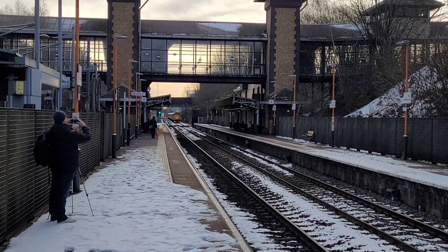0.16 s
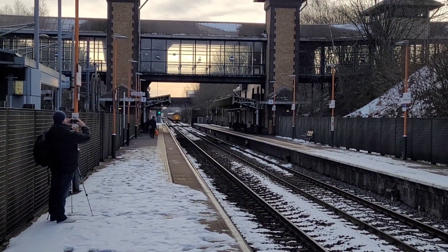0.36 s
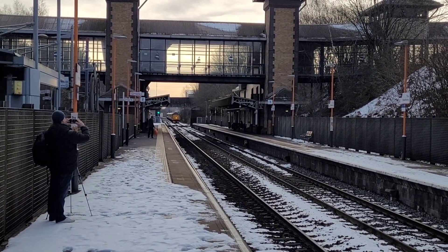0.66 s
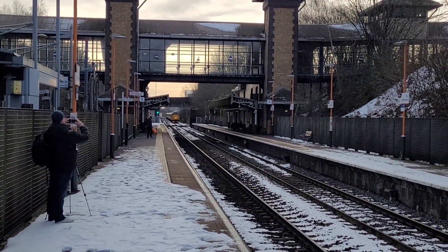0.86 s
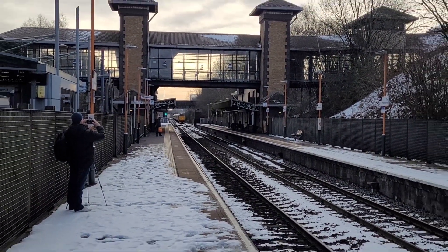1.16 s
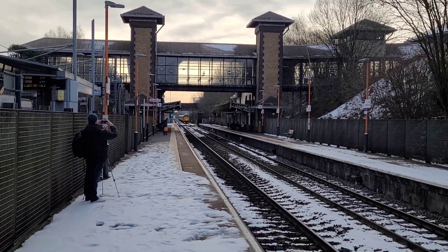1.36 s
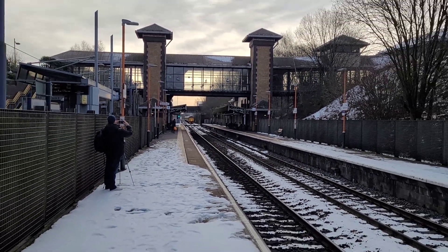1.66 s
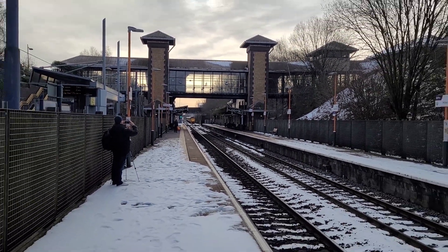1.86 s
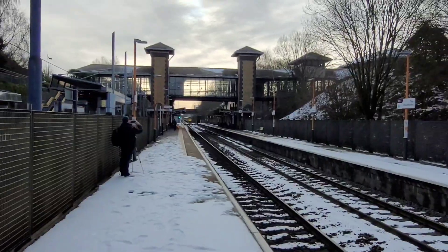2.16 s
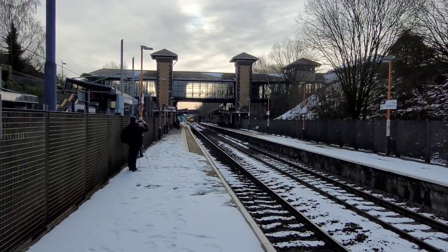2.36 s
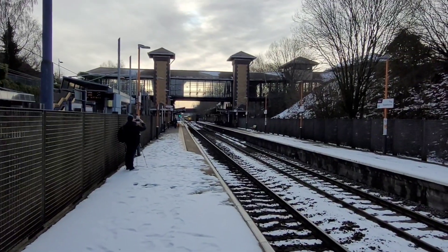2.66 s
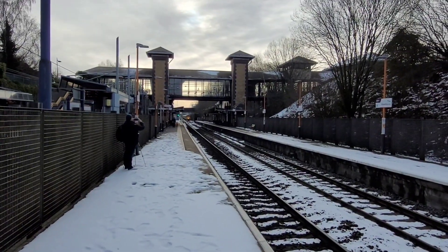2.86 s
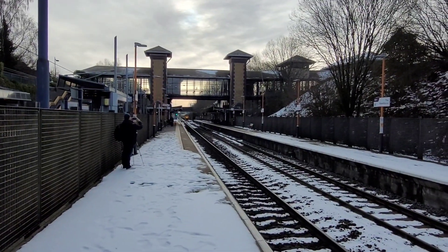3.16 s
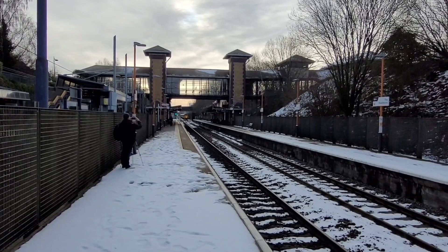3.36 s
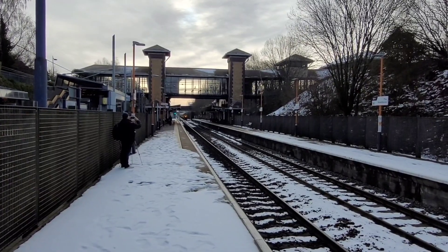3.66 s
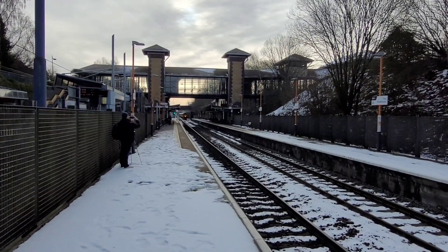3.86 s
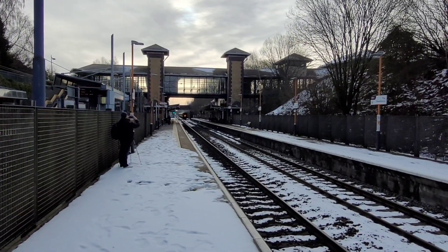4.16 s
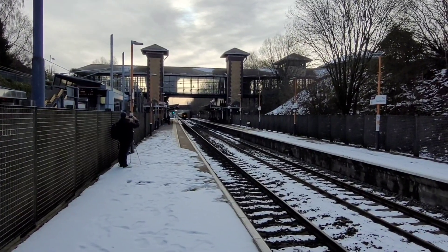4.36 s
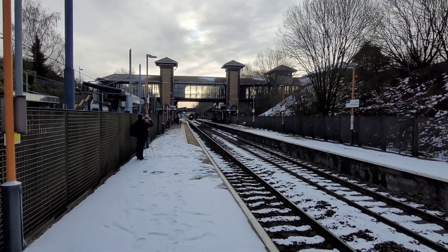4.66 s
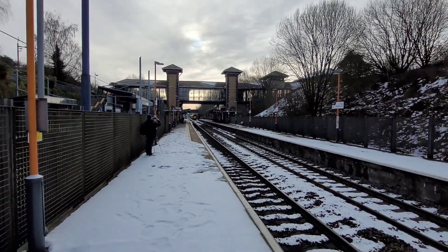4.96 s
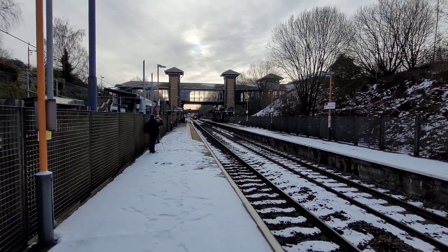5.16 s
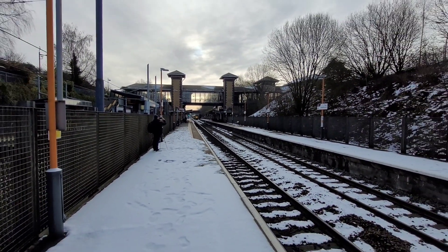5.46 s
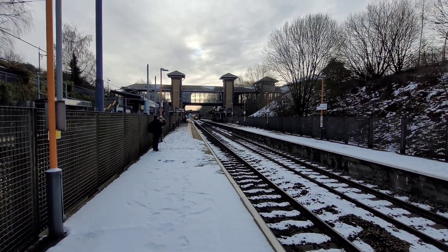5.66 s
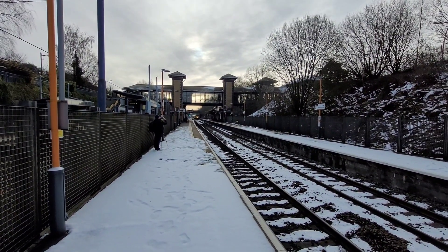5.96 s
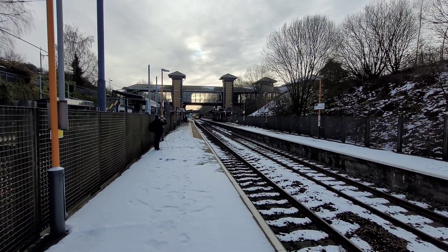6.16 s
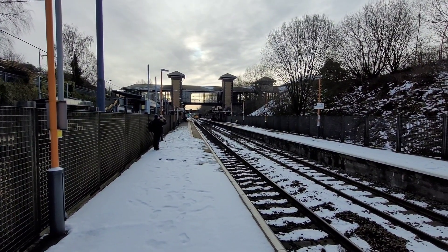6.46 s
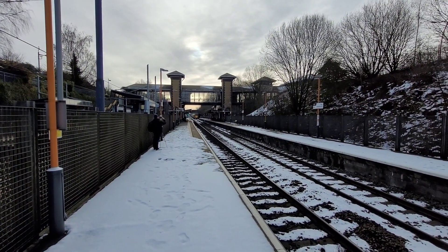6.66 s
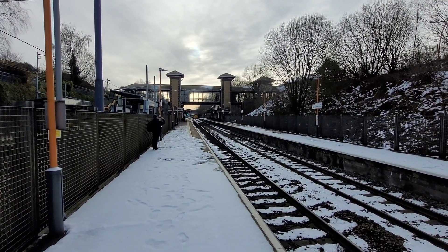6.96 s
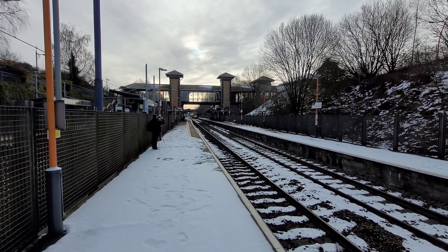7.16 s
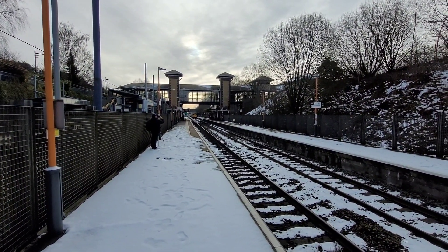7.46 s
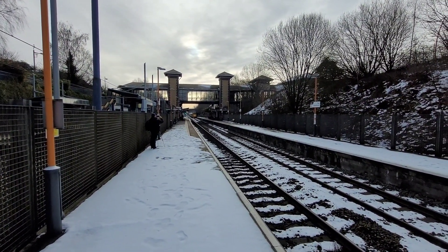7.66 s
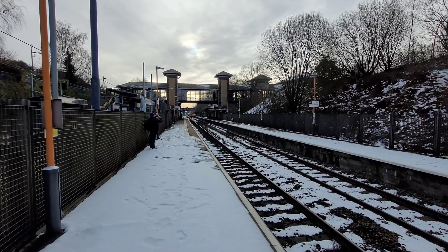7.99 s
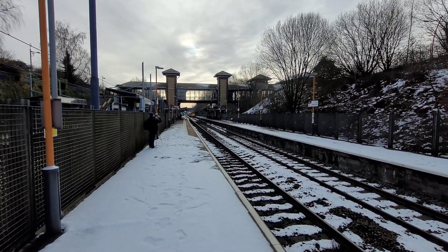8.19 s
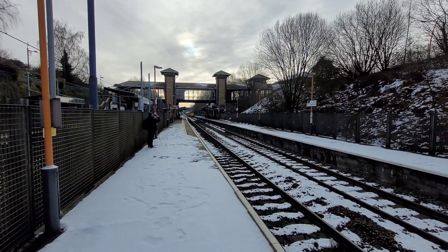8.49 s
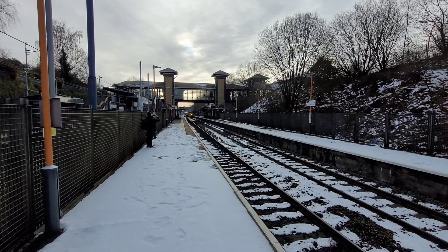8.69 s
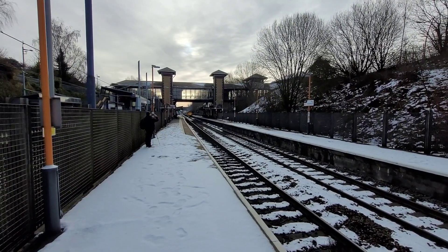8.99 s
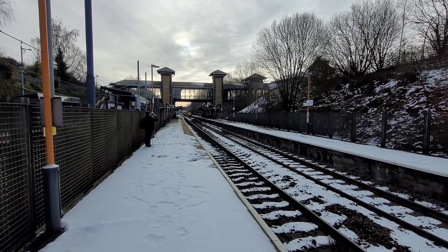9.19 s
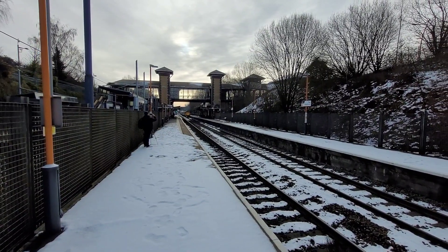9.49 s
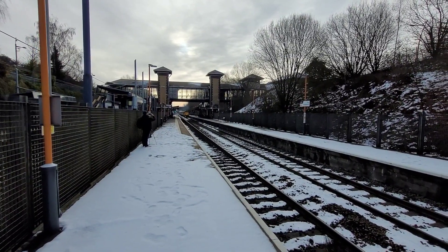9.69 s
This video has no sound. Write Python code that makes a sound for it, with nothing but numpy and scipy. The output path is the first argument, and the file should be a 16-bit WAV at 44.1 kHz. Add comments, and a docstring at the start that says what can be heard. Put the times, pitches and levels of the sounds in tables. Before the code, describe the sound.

Outdoors on a snowy station platform, two diesel locomotives approach under heavy load. A low, steady throbbing hum comes first, then exhaust roar, metallic clatter and hiss build, jumping up around halfway. A small bird sings quick gliding notes early and again later, with thin falling whistles from another, echoing off walls. Two short hollow pops come close on the right near the end. Stereo handheld microphone, train still approaching at the finish.

```python
"""A low, throbbing diesel hum comes first: two locomotives work hard up a straight line towards a platform.
Each four-stroke engine hums on multiples of its own firing cycle, built from sines; shaped noise makes rumble,
exhaust roar, clatter and hiss, which throb with the firings and swell. Decaying sines make knocks and barks.
Two small birds whistle gliding notes among echoing hard walls.
Late on, something close by on the right pops twice: a ringing cavity, then a short hiss."""
import sys
import numpy as np
from scipy import signal
from scipy.fft import rfft, irfft, next_fast_len
from scipy.io import wavfile
from scipy.ndimage import uniform_filter1d, map_coordinates

SR = 44100
rng = np.random.default_rng(int(sys.argv[2]) if len(sys.argv) > 2 else 0)


def master_out(mix):
    """Clip the mix to full scale and print it as 16-bit PCM to the path in sys.argv[1]."""
    frames = np.transpose(np.atleast_2d(mix))
    ceiling = np.clip(frames, -1, 1)
    pcm = np.round(ceiling * 32767).astype(np.int16)
    wavfile.write(sys.argv[1], SR, pcm)


N = 433503


def amp(db):
    """Decibels to amplitude."""
    return 10 ** (np.asarray(db) / 20)


def unit(x):
    """Scale to an rms of 1."""
    return x / np.sqrt(np.mean(x ** 2) + 1e-20)


def along(points, hz):
    """Read (Hz, value) points on a log frequency axis."""
    f, v = np.transpose(points)
    return np.interp(np.log(hz + 1), np.log(f + 1), v)


def curves(rows):
    """One value per sample for each column after the time."""
    s, *cols = np.transpose(rows)
    return [np.interp(np.arange(N) / SR, s, c) for c in cols]


def wobble(rate):
    """A smooth random curve with rate knots a second."""
    positions = np.arange(0, N + 64, 64) * rate / SR
    knots = map_coordinates(rng.standard_normal(int(N * rate / SR) + 4), [positions])
    return np.interp(np.arange(N), np.arange(len(knots)) * 64, knots)


def filtered(x, response):
    """Multiply the spectrum of x by a complex response of frequency."""
    m = next_fast_len(N + SR // 2)
    return irfft(rfft(x, m) * response(np.fft.rfftfreq(m, 1 / SR)), m)[..., :N]


def rush(spectrum, gate, patchy_db):
    """Two unrelated gated noises of rms 1, with patches of random gain in time and pitch."""
    z = signal.stft(rng.standard_normal((2, N)) * gate, nperseg=512)[2]
    field = rng.standard_normal(z.shape[1:])
    field = uniform_filter1d(uniform_filter1d(field, 4, 0), 8, 1)
    pair = signal.istft(z * amp(patchy_db * unit(field)), nperseg=512)[1][:, :N]
    return unit(filtered(pair, lambda hz: amp(along(spectrum, hz))))


def hum(turns, order, db, fading_db):
    """One order of a rotation; moving air and echoes make it fade and slip in phase."""
    slip = rng.uniform(0, 2 * np.pi) + .22 * wobble(2)  # radians
    level = np.sqrt(2) * amp(db + fading_db * wobble(2.5))
    return level * np.sin(2 * np.pi * order * turns + slip)


# Deep throb, rms: start_s, leading_9th_level_db, trailing_9th_level_db, leading_18th_level_db, leading_6th_level_db
THROB_LEVELS = [(0, -39, -56, -54, -50.5), (1.8, -37.5, -53.5, -53.5, -48), (2.2, -35.5, -48.5, -46, -51),
                (3.15, -38.5, -45, -45, -46.5), (3.6, -34.5, -45.5, -43.5, -45.5),
                (4.5, -35, -52.5, -44.5, -42.5), (4.98, -46, -46, -51.5, -45),
                (5.36, -31.5, -49.5, -38.5, -46), (6.13, -35, -41, -36.5, -42),
                (6.54, -31.5, -39.5, -36, -49), (7.03, -29, -35.5, -36.5, -46),
                (7.64, -40.5, -34.5, -41, -52), (8.3, -38, -32, -39.5, -45), (8.75, -38, -33, -36.5, -49),
                (9.36, -46.5, -43, -36.5, -44), (9.83, -38.5, -36.5, -39, -47.5)]
# Strong leading-engine orders: cycle_multiple, far_level_db (rms), near_level_db (rms)
LEADING_ORDERS = [(8, -58, -49), (10, -50, -46), (11, -54, -45), (12, -54, -43), (16, -54, -43),
                  (17, -57, -44), (19, -52, -46), (20, -69, -45), (22, -53, -37), (23, -52.5, -39),
                  (24, -67, -48), (25, -60, -46), (29, -66, -43), (30, -57, -50), (31, -62, -48),
                  (32, -58, -48), (34, -56, -47), (35, -55, -48), (46, -60.5, -47)]
# Trailing-engine orders: cycle_multiple, level_db (relative to its ninth)
TRAILING_ORDERS = [(6, -17), (11, -11), (16, -13), (18, -11), (19, -13), (22, -12), (27, -10), (34, -4)]
# Remaining leading orders from the 13th to the 47th, with random scatter in level
FAINT_FAR_DB, FAINT_NEAR_DB, FAINT_SCATTER_DB = -67.5, -59.5, 3


def engine_hum(near, lead_turns, trail_turns):
    """Periodic firing makes sines at whole multiples of each engine's cycle rate."""
    lead_db, trail_db, octave_db, firing_db = curves(THROB_LEVELS)
    tones = hum(lead_turns, order=9, db=lead_db, fading_db=-0.5)
    tones += hum(trail_turns, order=9, db=trail_db, fading_db=3)
    tones += hum(lead_turns, order=18, db=octave_db, fading_db=1.5)
    tones += hum(lead_turns, order=6, db=firing_db, fading_db=1.5)
    strong = [18] + [round(row[0]) for row in LEADING_ORDERS]
    scatter_db = FAINT_SCATTER_DB * rng.standard_normal(35)
    faint = [(k, FAINT_FAR_DB + d, FAINT_NEAR_DB + d)
             for k, d in zip(range(13, 48), scatter_db) if k not in strong]
    for k, far_db, near_db in LEADING_ORDERS + faint:
        level_db = far_db + near * (near_db - far_db)
        tones += hum(lead_turns, order=round(k), db=level_db, fading_db=1.5)
    for k, db in TRAILING_ORDERS:
        tones += hum(trail_turns, order=round(k), db=trail_db + db, fading_db=2.5)
    return tones


# Uneven strength of the six firings in a cycle: level_db
CYLINDER_LEVELS = [-3.5, -6, 2, -8.5, 2, 0]


def firing_puffs(firing):
    """Each of six firings a cycle opens a burst that decays towards the next."""
    strength = amp(np.take(CYLINDER_LEVELS, firing.astype(int) % 6))
    puffs = strength * np.exp(-2.5 * (firing % 1))
    return unit(uniform_filter1d(puffs, 250))  # echoes blur the puffs


# Noise colours of the engine layers, each: pitch_hz, level_db (relative, per Hz)
RUMBLE_COLOUR = [(22, -49.5), (31, -29.5), (42, -5), (52, -11.5), (70, -5.5), (102, -0.5), (145, -1.5),
                 (200, -5), (249, 0), (370, -16.5), (460, -11), (570, -20), (770, -120)]
ROAR_COLOUR = [(210, -11.5), (350, -5), (390, -6.5), (451, -1.5), (596, -3.5), (690, -0.5), (830, -3.5),
               (1000, -8), (1150, -9.5), (1500, -59.5), (2530, -120)]
CLATTER_COLOUR = [(680, -30.5), (1150, -3.5), (1560, -1), (1780, -8.5), (1970, -10), (2200, -13),
                  (2500, -23), (3120, -46), (5280, -120)]
HISS_FAR_COLOUR = [(1410, -21), (2400, -1.5), (2800, 0), (3050, -1), (3320, -0.5), (3680, -6.5), (4050, -7),
                   (4550, -9), (5970, -24), (8000, -36.5), (10400, -67), (17600, -120)]
HISS_NEAR_COLOUR = [(1410, -26), (2400, -3.5), (4740, -6.5), (6950, -16.5), (8310, -33), (9950, -26),
                    (11500, -43.5), (12100, -58), (15500, -48.5)]
# Base levels in dB: the rumble's before its nearness gain, the others' before the swell is added
RUMBLE_DB, ROAR_DB, HISS_FAR_DB, HISS_NEAR_DB = -45.5, -41.5, -61, -55
RUMBLE_NEAR_DB = 12  # gained as the hum nears
HISS_GROWS = 0.86  # dB gained per dB of swell


def engine_noise(near, bright, puffs, swell_db, roar_db, clatter_db):
    """Noise throbs with the firings; the air swallows less treble as the path shortens."""
    def gate(depth):
        # each part of the engine puffs at its own moment of the cycle
        shifted = np.roll(puffs, rng.integers(SR // 7))
        return 1 + depth * amp(4.1 * wobble(1.707)) * (shifted - 1)

    hiss_db = HISS_GROWS * swell_db
    rumble_level = amp(RUMBLE_DB + RUMBLE_NEAR_DB * near)
    far_level = amp(hiss_db + HISS_FAR_DB) * np.sqrt(1 - bright)
    near_level = amp(hiss_db + HISS_NEAR_DB) * np.sqrt(bright)
    noise = rumble_level * rush(RUMBLE_COLOUR, gate(0.16), patchy_db=2.2)
    noise += amp(ROAR_DB + roar_db) * rush(ROAR_COLOUR, gate(0.17), patchy_db=1.4)
    noise += amp(clatter_db) * rush(CLATTER_COLOUR, gate(0.22), patchy_db=2.0)
    noise += far_level * rush(HISS_FAR_COLOUR, gate(0.29), patchy_db=2.0)
    noise += near_level * rush(HISS_NEAR_COLOUR, gate(0.26), patchy_db=2.0)
    return noise


# Blower whistles: pitch_hz, level_db (relative)
WHISTLES = [(4829, 0), (3651, -5)]
# Shared whistle level: start_s, level_db (rms)
WHISTLE_LEVEL = [(0, -84), (3.7, -79), (4.2, -73), (5.3, -72), (6.5, -68), (7.5, -63), (9.83, -64)]


def blower_whine():
    """Blowers whistle as thin sines whose pitch wanders slightly."""
    out = np.zeros(N)
    for hz, db in WHISTLES:
        drift = np.cumsum(1 + .0015 * wobble(12)) / SR
        out += hum(drift, order=hz, db=db + curves(WHISTLE_LEVEL)[0], fading_db=2.5)
    return out


# Clearest metal knocks, often one cycle apart: start_s, level_db (before the attack), pitch_hz
CLEAR_KNOCKS = [(2.9, -25, 1107), (3.13, -22, 1620), (3.18, -29.5, 2020), (3.232, -26.5, 1600),
                (3.32, -27, 1410), (3.392, -35.5, 2050), (3.468, -24.5, 1397), (3.692, -22.5, 1640),
                (3.833, -26, 1820), (4.018, -31, 1990), (4.158, -31.5, 2015), (4.297, -28.5, 1690),
                (5.274, -23.5, 2040), (5.974, -22.5, 1660), (6.82, -25.5, 1980), (4.788, -28, 2980),
                (5.207, -46, 2950), (5.892, -37, 3150), (6.047, -30.5, 3310), (6.162, -40, 3210),
                (6.188, -25, 3050), (6.606, -38, 3140)]


def metal_knocks(firing, clatter_db):
    """Every firing knocks the block a little, a few much harder; each knock is a decaying sine."""
    out, t = np.zeros(N), np.arange(600) / SR
    at = np.flatnonzero(np.diff(firing.astype(int)))
    luck = rng.random((len(at), 3))
    rare_db = -2.5 * np.log(1 - .97 * luck[:, 1])
    size_db = clatter_db[at] + 3.5 + rare_db - 9 * luck[:, 2]  # higher knocks are fainter
    chance = zip(at / SR + .02 * luck[:, 0], size_db, 1300 + 900 * luck[:, 2])
    for s, db, hz in CLEAR_KNOCKS + list(chance)[:-2]:  # the last two would crowd the end
        knock = (1 - np.exp(-t / 0.001)) * amp(db - 60 * t / 0.033) * np.sin(2 * np.pi * hz * t)
        out[round(s * SR):][:len(t)] += knock
    return out


# Hard exhaust barks: start_s, level_db (before the attack), pitch_hz
BARK_HITS = [(0.456, -29.5, 1300), (4.043, -29, 777), (4.302, -26.5, 794), (4.396, -24.5, 854),
             (4.843, -21.5, 587), (5.089, -23, 774), (5.183, -19, 808), (5.232, -16.5, 878),
             (5.258, -19, 778), (5.401, -29.5, 704), (5.464, -20, 820), (5.631, -21, 828),
             (5.651, -19, 832), (5.824, -20.5, 624), (5.972, -15.5, 557), (6.767, -23, 714),
             (7.895, -22, 640), (9.198, -15.5, 628)]


def exhaust_barks():
    """A hard exhaust bark is a sine with a very fast attack and a short decay."""
    out, t = np.zeros(N), np.arange(600) / SR
    for s, db, hz in BARK_HITS:
        envelope = (1 - np.exp(-(t / 0.00017) ** 2)) * amp(db - 60 * t / 0.026)
        out[round(s * SR):][:len(t)] += envelope * np.sin(2 * np.pi * hz * t)
    return out


# Approach: start_s, hum_nearness (0-1), treble_share let through by the air (0-1)
NEARING = [(0, 0, 0), (2, 0.24, 0.03), (3.5, 0.29, 0.01), (5, 0.48, 0.05), (5.5, 0.79, 0.05),
           (6.3, 0.81, 0.14), (7.5, 1, 0.23), (8.7, 1, 0.74), (9.83, 1, 0.9)]
# Engine speeds, each: start_s, cycle_hz
LEADING_SPEED = [(0, 7.149), (2.5, 7.155), (5, 7.155), (6.5, 7.144), (9.83, 7.141)]
TRAILING_SPEED = [(0, 6.69), (4, 6.63), (6.5, 6.605), (9.83, 6.59)]
# Swell of the engine noise: start_s, general_gain_db, roar_gain_db
NOISE_SWELL = [(0, 0, -2), (.4, 2, 0), (1.75, 2, 0), (2.3, 3.5, 2), (3, 5, 3), (3.9, 6, 3.5), (4.4, 6, 6.5),
               (4.95, 7, 8.5), (5.2, 12.5, 9.5), (5.38, 13.5, 8), (5.7, 13.5, 10.5), (6.07, 14, 10),
               (6.4, 10.5, 8), (7.1, 10.5, 9.5), (8.1, 10.5, 10), (8.7, 11.5, 12), (9.3, 11.5, 10.5),
               (9.83, 12.5, 11)]
CLATTER_DB, CLATTER_GROWS = -47.5, 0.84  # base level, dB gained per dB of swell


def engines():
    """Both engines as (direct sound, scattered sound), driven by their cycles and the approach."""
    near, bright = np.clip(curves(NEARING), 0, 1)
    lead_turns = np.cumsum(curves(LEADING_SPEED)[0]) / SR
    trail_turns = np.cumsum(curves(TRAILING_SPEED)[0]) / SR
    firing = 6 * lead_turns
    swell_db, roar_db = curves(NOISE_SWELL)
    clatter_db = CLATTER_DB + CLATTER_GROWS * swell_db
    tones = engine_hum(near, lead_turns, trail_turns)
    noise = engine_noise(near, bright, firing_puffs(firing), swell_db, roar_db, clatter_db)
    noise[0] += blower_whine() + metal_knocks(firing, clatter_db) + exhaust_barks()
    return noise + tones * [[1], [.1]]


# Likeness of the two ports: pitch_hz, likeness (1 = alike)
PORT_LIKENESS = [(60, 1), (250, 0.86), (700, 0.98), (1400, 0.64), (2800, 0.39), (5000, 0.58), (12000, 0.48)]
# Phase lead of the left port: pitch_hz, lead_radians
LEFT_PHASE = [(0, 0.51), (780, 0.14), (1030, 0.78), (1380, 0.26), (1720, 1.08), (1980, 0.9), (2670, 3),
              (3010, 2.5), (3960, 0.78), (4820, 0.91), (6370, 2.2), (9040, 3.9), (11100, 2.1), (15200, 6.1)]
# Level balance: pitch_hz, left_minus_right_db
LEFT_BALANCE = [(60, -2.2), (110, -1.7), (200, -1.3), (380, -0.8), (700, -3.0), (1290, -5.5), (2380, -1.5),
                (4400, -.5), (8120, 1.5), (15000, 2.5)]


def ports(direct, scattered):
    """Two microphone ports: alike in the bass, less so in the treble; the train drifts to the left."""
    def turn(hz):
        return np.arccos(np.clip(along(PORT_LIKENESS, hz), -1, 1)) / 2

    def half(hz):
        # half of the difference goes to each port
        return amp(along(LEFT_BALANCE, hz) / 2) * np.exp(.5j * along(LEFT_PHASE, hz))

    mid = filtered(direct, lambda hz: np.cos(turn(hz)))
    side = filtered(scattered, lambda hz: np.sin(turn(hz)))
    pair = np.array([mid + side, mid - side])
    left, right = filtered(pair, lambda hz: np.array([half(hz), 1 / half(hz)]))
    early = np.linspace(-1.5, 1.5, N)  # samples
    return np.array([map_coordinates(left, [np.arange(N) + early], mode="nearest"), right])


SHADE_HZ = 5200  # above it branches hide a singer's direct path
FIRST_WALL_S, BANK_S, BANK_DEPTH_S = .005, .08, .04  # echo begins, peaks off the far bank, is spread
HEDGE_DB, HEDGE_T60_S, YARD_T60_S = 3, .07, .85  # quick scatter off near branches over the long echo


def yard_echo(t):
    """Decaying noise: near branches, a far bank and a long yard echo, after the first wall."""
    hedge = amp(HEDGE_DB - 60 * t / HEDGE_T60_S)
    bank = .5 * np.exp(-((t - BANK_S) / BANK_DEPTH_S) ** 2)
    envelope = (hedge + amp(-60 * t / YARD_T60_S) + bank) * (t > FIRST_WALL_S)
    tail = rng.standard_normal((2, len(t))) * envelope
    return tail / np.linalg.norm(tail[0])


def bird(notes, times, left_db, shade_db_per_khz):
    """Whistled glides through three pitches, each phrase with its own echo off walls and banks."""
    out, t = np.zeros((2, N + 3 * SR)), np.arange(SR // 2) / SR
    for s, db, echo_db, stretch in times:
        dry, seen = np.zeros((2, 2 * SR))  # the full song, and what reaches us directly
        for start, length, a_hz, b_hz, c_hz, note_db in notes:
            start, length = start * stretch, length * stretch
            u = np.linspace(0, 1, round(length * SR))
            # a parabola through the three pitches
            hz = 2 * (u - .5) * (u - 1) * a_hz - 4 * u * (u - 1) * b_hz + 2 * u * (u - .5) * c_hz
            flutter = np.sin(2 * np.pi * (58 * u * length + rng.random()))  # in pitch and level
            hz += 55 * flutter
            envelope = amp(note_db + 3 * flutter) * np.sin(np.pi * u) ** 0.5
            note = envelope * np.sin(2 * np.pi * np.cumsum(hz) / SR)
            shade = amp(-shade_db_per_khz * np.maximum(hz - SHADE_HZ, 0) / 1000)
            first = max(round(start * SR), 0)
            dry[first:][:len(u)] += note
            seen[first:][:len(u)] += note * shade
        wet = signal.fftconvolve(dry[None], yard_echo(t), axes=1)[:, :len(dry)]
        phrase = seen * amp([[left_db], [-left_db]]) + amp(echo_db) * wet
        out[:, round(s * SR):][:, :len(dry)] += amp(db) * phrase
    return out[:, :N]


# Song notes before stretch and flutter: start_s, length_s, first_hz, middle_hz, last_hz, level_db (relative)
SONG_NOTES = [(0.0, 0.085, 5050, 5170, 5130, -3), (.23, 0.029, 4410, 4240, 3580, -5.5),
              (.397, 0.037, 6480, 6050, 5250, -4), (.44, 0.021, 4400, 4920, 4190, -1),
              (.463, .014, 4100, 4860, 5380, 0), (.477, 0.024, 5300, 5250, 5030, -7),
              (.547, 0.024, 4850, 5520, 4480, -4), (.572, 0.022, 4450, 5135, 4570, 3.5),
              (.608, 0.036, 4480, 4440, 4150, -1), (.69, 0.028, 6240, 6040, 5900, -6),
              (.722, 0.056, 7150, 6280, 5670, -5.5), (.788, 0.03, 4750, 5040, 5200, -3.5),
              (.815, 0.021, 5850, 5500, 5100, -4), (.838, 0.026, 5250, 5470, 5660, -1.5),
              (.928, 0.023, 4000, 4570, 3890, -1.5), (.956, 0.015, 4250, 4320, 3800, -2.5),
              (.98, 0.032, 4450, 4810, 3940, -4), (1.06, 0.02, 4950, 4580, 3940, -5),
              (1.155, 0.067, 5340, 4830, 4460, 2), (1.235, 0.036, 4920, 4970, 4780, -1),
              (1.315, 0.025, 6200, 5760, 5830, -16), (1.328, 0.035, 5050, 5480, 5730, -2),
              (1.358, 0.115, 5600, 5400, 5030, -4.5), (1.64, 0.05, 3900, 4780, 5120, -1),
              (1.685, 0.018, 5180, 4740, 4250, -0.5), (1.725, 0.02, 5310, 4830, 4210, -2),
              (1.77, 0.016, 5380, 4800, 4320, -12), (1.81, 0.016, 5300, 4540, 4330, -5)]
# Songs: start_s, level_db, echo_db (relative), time_stretch (factor)
SONG_TIMES = [(1.003, -54.5, 5, 1.022), (6.8, -49.5, -1.5, 1)]


def singer():
    """A bird left of centre sings quick glides, its direct treble shaded by branches."""
    return bird(SONG_NOTES, SONG_TIMES, left_db=4.0, shade_db_per_khz=3.5)


# Call notes before stretch and flutter: start_s, length_s, first_hz, middle_hz, last_hz, level_db (relative)
CALL_NOTES = [(0, 0.051, 7700, 7600, 6450, -5), (.16, 0.059, 7830, 7430, 6540, -5.5),
              (.29, .05, 7500, 7100, 6550, -9)]
# Calls: start_s, level_db, echo_db (relative), time_stretch (factor)
CALL_TIMES = [(1.325, -73, 5, 0.96), (4.345, -68, 3, 1), (7.83, -66, 1, 1)]


def caller():
    """A second bird, also left, repeats three falling whistles on an unshaded path."""
    return bird(CALL_NOTES, CALL_TIMES, left_db=5.0, shade_db_per_khz=0)


# Pops: start_s, level_db (before port gain), cavity_hz, t60_s, hiss_level_db (rms before its envelope)
POP_HITS = [(8.8572, -.2, 850, 0.0062, -56), (9.413, 3.2, 680, 0.0085, -50)]
# Colour of the hiss after a pop: pitch_hz, level_db (relative, per Hz)
PUFF_COLOUR = [(3530, -28.5), (6000, -4), (7380, -3), (8450, -16), (9000, -16), (12800, -8), (15500, -19.5)]
THUD_HZ, THUD_DB, THUD_T60_S = 474, -17.5, 0.011  # the duller body under each pop
SNAP_HZ, SNAP_DB, SNAP_T60_S = 1800, -27, .006  # the sharp edge on top of it


def pops():
    """A small hollow cavity rings briefly as decaying modes; a short hiss follows."""
    out, t = np.zeros((2, N + SR)), np.arange(SR // 5) / SR
    hiss = rush(PUFF_COLOUR, 1, patchy_db=4.0)
    late = t - np.array([[.00012], [0]])  # the left port lies farther away
    thud = amp(THUD_DB - 60 * late / THUD_T60_S) * np.sin(2 * np.pi * THUD_HZ * late)
    snap = amp(SNAP_DB - 60 * late / SNAP_T60_S) * np.sin(2 * np.pi * SNAP_HZ * late)
    attack = (1 - np.exp(-(late / 0.00055) ** 2)) * (late > 0)
    swell = np.interp(t, [.004, .012, .065, .1], [0, 1, .7, 0])
    for s, db, hz, t60, hiss_db in POP_HITS:
        modes = np.sin(2 * np.pi * hz * late) + 0.17 * np.sin(2 * np.pi * 2.0 * hz * late)
        ring = (modes * amp(-60 * late / t60) + thud + snap) * attack
        first = round(s * SR)
        out[:, first:][:, :len(t)] += amp(db + np.array([[2.5], [5]])) * ring  # louder on the right
        out[:, first:][:, :len(t)] += amp(hiss_db) * swell * hiss[:, first:][:, :len(t)]
    return out[:, :N]


def scene():
    """The train through the two ports, with both birds and the close pops."""
    return ports(*engines()) + singer() + caller() + pops()


# Hiss of the microphones: pitch_hz, level_db (relative, per Hz)
MICROPHONE_HISS = [(5000, -34.5), (8500, -5.5), (10400, -4), (13200, 0), (15500, -5)]
TOP_HZ = 15700


def record(dry):
    """The microphones add hiss; the tallest peaks are rounded off and nothing above TOP_HZ is kept."""
    noisy = dry + amp(-82.5) * rush(MICROPHONE_HISS, 1, patchy_db=3.5)
    rounded = noisy / (1 + np.abs(noisy) ** 8) ** (1 / 8)
    return filtered(rounded, lambda hz: hz < TOP_HZ)


dry = scene()
out = record(dry)
master_out(out)
```